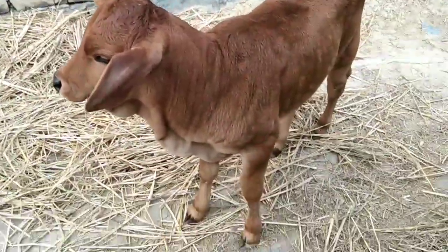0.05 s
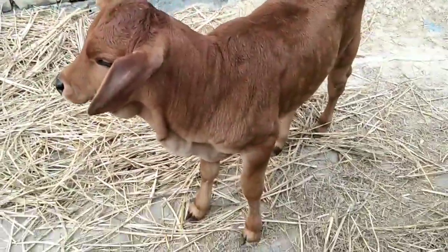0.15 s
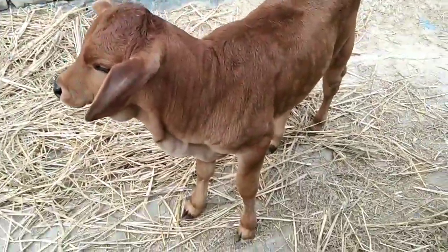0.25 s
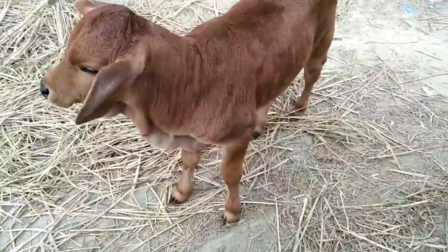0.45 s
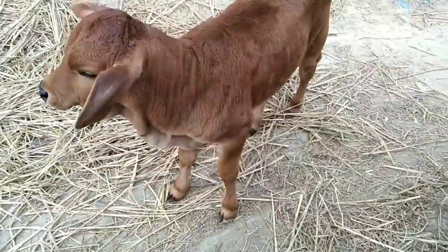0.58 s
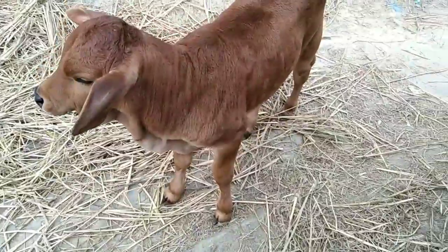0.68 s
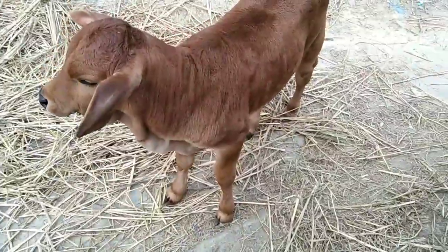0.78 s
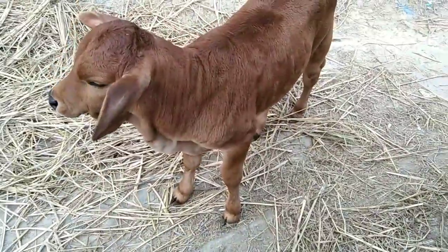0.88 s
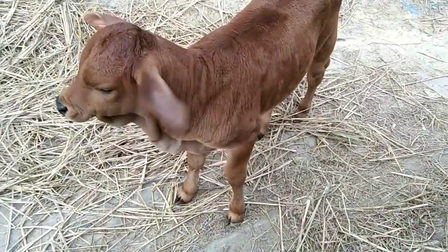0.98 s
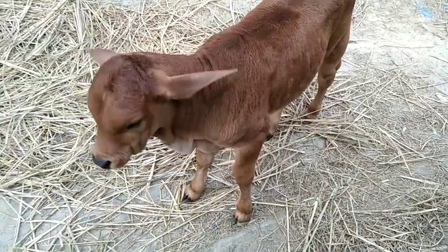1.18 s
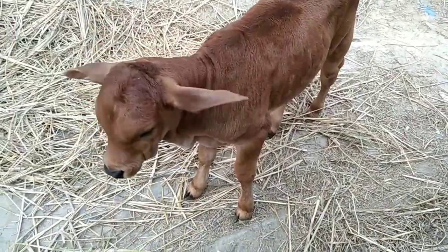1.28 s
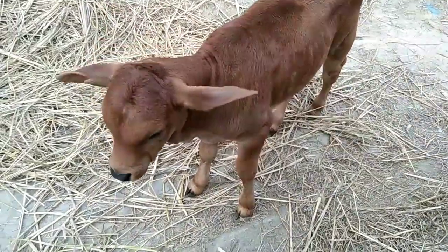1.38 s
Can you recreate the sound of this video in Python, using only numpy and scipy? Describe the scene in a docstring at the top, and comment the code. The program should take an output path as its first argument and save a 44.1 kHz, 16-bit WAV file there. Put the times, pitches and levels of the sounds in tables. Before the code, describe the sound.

A calf bleats once, a harsh, quavering call that throbs rapidly and sags in pitch at the end. Straw rustles faintly underneath, with a brief echo off the farmyard walls and a low outdoor rumble.

```python
"""Calf bleat in a walled farmyard.

One harsh, quavering bleat throbs ten times: the pitch climbs, then drops as the tone gives way to rasp.
Jittery vocal-fold pulses and puffs of noise ring in the throat while the mouth opens and closes.
Straw rustles, a stalk creaks, the walls ring briefly; a low rumble and a faint far hum lie underneath."""
import sys
import numpy as np
from scipy import signal
from scipy.fft import rfft, irfft
from scipy.io import wavfile
from scipy.ndimage import uniform_filter1d

SR = 44100
rng = np.random.default_rng(int(sys.argv[2]) if len(sys.argv) > 2 else 0)


def unload_audio(sound):
    """Save the sound as a 16-bit wav file, at the path given as the first command line argument."""
    columns = np.transpose(np.atleast_2d(sound))
    # keep every value between -1 and 1, then stretch to whole-number steps
    steps = np.round(np.clip(columns, -1, 1) * 32767)
    wavfile.write(sys.argv[1], SR, steps.astype(np.int16))


N = 63945
TIME_S = np.arange(N) / SR
FREQ_HZ = np.fft.rfftfreq(N, 1 / SR)

# Noise spectra. Each row: frequency in Hz, relative level in dB.
RUMBLE_SPECTRUM = [(20, -20.5), (40, -11), (65, 4), (130, 1), (210, -8.5), (300, -21.5), (500, -27.5),
                   (750, -29.5), (1500, -26.5), (2600, -47), (4500, -42), (8000, -40.5), (12000, -43.5),
                   (15000, -54.5)]
LOW_RUSTLE_SPECTRUM = [(40, -31), (110, -2), (260, -3.5), (430, 0.5), (560, -1.5), (700, -15.5),
                       (1500, -50.5)]
STRAW_SPECTRUM = [(1000, -35), (3500, -23.5), (5000, -8), (7700, 0.5), (9500, -1.5), (12000, -13),
                  (15500, -26.5)]
CREAK_SPECTRUM = [(1000, -22.5), (1350, -12.5), (1520, 5.5), (1700, -15), (2400, -6), (2700, -12.5),
                  (3000, 2.5), (3350, -1), (3600, 1), (4100, -13.5), (5200, -9), (6000, -39.5)]
RASP_SPECTRUM = [(500, -6.5), (850, -8), (1050, -1), (2400, 5), (4200, -2), (7000, 1)]
# Level curves. Each row: time in seconds, gain in dB.
RUMBLE_ENVELOPE = [(0, -64.5), (.2, -67.5), (.7, -69), (1.0, -71.5), (1.18, -70.5), (1.29, -64),
                   (1.45, -72)]
HUM_ENVELOPE = [(0, -80), (.2, -76.5), (.3, -97.5), (1.22, -91), (1.275, -67), (1.32, -80.5), (1.42, -66),
                (1.45, -66.5)]
LOW_RUSTLE_ENVELOPE = [(0, -77), (.17, -78), (.25, -62), (.42, -58.5), (.58, -62.5), (.75, -66.5),
                       (.9, -80), (1.2, -98.5), (1.27, -81.5), (1.45, -75.5)]
# Far hum. Each row: centre in Hz, width in Hz, relative level in dB.
HUM_BANDS = [(492.5, 71, -1), (1019, 55, -19), (1566, 33, -26.5)]
# Yard decay. Each row: frequency in Hz, time to fall 60 dB in seconds.
YARD_DECAY = [(200, 0.01), (800, 0.34), (2400, 0.3786), (4200, 0.4313), (8000, 0.4285), (14000, 0.25)]
# Yard echo colour. Each row: frequency in Hz, gain in dB.
YARD_SPECTRUM = [(200, -8), (700, -9), (780, -3), (860, -13), (1010, 4), (1200, -2), (1550, 6.5),
                 (1800, 4.5), (2020, 3), (2330, 0), (2800, -5.5), (3450, -2.5), (3800, -10.5), (4220, -1),
                 (4800, -5), (8000, -2.5)]
# Ground and near walls. Each row: delay in seconds, signed gain.
REFLECTIONS = [(.0011, 0.47), (.0029, -0.38), (.0047, .3), (.0075, .18)]
# Straw events. Each row: peak time in seconds, level in dB, rise in seconds, decay in seconds.
RUSTLE_BURSTS = [(0.014, -58, 0.0244, 0.0221), (.16, -67, 0.0071, 0.007827), (0.244, -62.5, .022, 0.054),
                 (0.34, -58.5, 0.0132, 0.026), (.435, -55, 0.01675, 0.038), (0.484, -56, 0.018, 0.017),
                 (0.571, -64.5, 0.014, 0.067)]
CREAK_BURSTS = [(.128, -73, .007, .06)]
# Throat response, mouth open and nearly shut. Each row: frequency in Hz, gain in dB.
THROAT_OPEN = [(150, -41.5), (330, -46.5), (425, -19), (520, -40.5), (610, -25), (700, -11), (790, -3.5),
               (855, 2), (930, -8), (1020, -4.5), (1110, -17.5), (1210, -6), (1290, -19.5), (1400, -22.5),
               (1850, -31.5), (2050, -14.5), (2220, -10.5), (2430, -6), (2750, -28), (3020, -10.5),
               (3150, -15), (3400, -4.5), (3550, -15.5), (3780, -3), (4000, -6.5), (4220, -2.5),
               (4450, -18.5), (5200, -19.5), (5600, -17), (6000, -25.5), (8000, -26), (8900, -33),
               (9500, -50.5), (15000, -65)]
THROAT_SHUT = [(150, -35), (420, -46), (580, -33.5), (750, -2.5), (880, 1), (1000, -19.5), (1350, -28.5),
               (1900, -26.5), (2300, -9), (2850, -33), (3450, -7.5), (3900, -15.5), (4250, -5.5),
               (4700, -17), (6000, -23), (7800, -29), (9000, -63), (15000, -56.5)]
# Throbs of the bleat. Each row: centre in seconds, pitch near the top in Hz, drive gain in dB,
# treble gain in dB, rasp gain in dB, mouth opening from 0 to 1.
BLEAT_THROBS = [(.252, 431.2, -47.5, -1, 2.5, 0), (.357, 426.7, -40.5, -1.5, 1.5, 0.58),
                (.448, 428.8, -39.5, 0.5, 0, 0.75), (.545, 429.8, -42.5, -.5, 3.5, 0.97),
                (.640, 424.2, -44, 0, 4, 0.91), (.737, 421.8, -43.5, 0.5, 2, 0.91),
                (.833, 416.5, -43.5, -1.5, 1, 0.94), (.930, 407.7, -42.5, -2, -2, 0.66),
                (1.028, 405, -44, -2, 1.5, 0.51), (1.116, 390.7, -42, -2, -7.5, 0.04)]
# Course of one throb. Each row: position from -0.5 to 0.5, ratio to the top pitch, tone gain in dB.
THROB_CONTOUR = [(-.5, .87, -17.5), (-.33, .945, -11), (-.16, .99, -2), (0, 1.008, -1.5), (.09, 1.0, -2),
                 (.19, 0.863, -6), (.3, .81, -12), (0.501, .87, -16.5)]


def amp(db):
    """Decibels to gain."""
    return 10 ** (np.asarray(db) / 20)


def unit_rms(x):
    """Scale to an rms of one."""
    return x / np.sqrt(np.mean(x ** 2) + 1e-20)


def at_hz(points, hz):
    """Interpolate on a log-frequency axis."""
    point_hz, value = np.transpose(points)
    return np.interp(np.log(hz + 1), np.log(point_hz + 1), value)


def envelope(points):
    """Gain over time from (s, dB) points."""
    return amp(np.interp(TIME_S, *np.transpose(points)))


def filtered(x, gain):
    """Apply one gain per frequency."""
    return irfft(rfft(x) * gain, N)


def lowpass(x, cutoff_hz, order=6):
    """Zero-phase low-pass."""
    return filtered(x, 1 / (1 + (FREQ_HZ / cutoff_hz) ** order))


def noise(spectrum):
    """Unit-rms coloured noise."""
    return unit_rms(filtered(rng.standard_normal(N), amp(at_hz(spectrum, FREQ_HZ))))


def wobble(rate_hz):
    """Unit-rms random wavering up to a rate."""
    return unit_rms(lowpass(rng.standard_normal(N), rate_hz, order=4))


def burst(peak_s, db, rise_s, decay_s):
    """Envelope: Gaussian rise, exponential decay."""
    age_s = TIME_S - peak_s
    return amp(db) * np.exp(-(np.minimum(age_s, 0) / rise_s) ** 2 - np.maximum(age_s, 0) / decay_s)


def far_hum():
    """Faint hum of narrow noise bands."""
    hum = np.zeros(N)
    for centre_hz, width_hz, db in HUM_BANDS:
        band = 1 / (1 + (2 * (FREQ_HZ - centre_hz) / width_hz) ** 2)
        hum += amp(db) * unit_rms(filtered(rng.standard_normal(N), band))
    return hum * envelope(HUM_ENVELOPE)


def rumble():
    """Low outdoor noise, drifting in level."""
    return noise(RUMBLE_SPECTRUM) * envelope(RUMBLE_ENVELOPE)


def yard_echo(x):
    """Dense wall echoes, each band dying at its own rate."""
    hz, age_s, bands = signal.stft(rng.standard_normal(SR), SR, nperseg=256)
    t60_s = at_hz(YARD_DECAY, hz)[:, None]
    gain = amp(at_hz(YARD_SPECTRUM, hz))[:, None] * np.sqrt(2 * np.log(1000) / (t60_s * SR))
    decay = np.exp(-np.log(1000) * age_s / t60_s)
    tail = signal.istft(bands * gain * decay, SR, nperseg=256)[1]
    return signal.fftconvolve(x, np.r_[np.zeros(200), tail])[:N]


def early_reflections(x):
    """Ground and near walls return the treble within milliseconds."""
    treble = x - lowpass(x, cutoff_hz=1712)
    return sum(gain * np.interp(TIME_S - delay_s, TIME_S, treble, left=0)
               for delay_s, gain in REFLECTIONS)


def low_rustle():
    """Dull noise swelling under the bleat."""
    return noise(LOW_RUSTLE_SPECTRUM) * envelope(LOW_RUSTLE_ENVELOPE)


def straw(grain_db=1.5):
    """Grainy rustles and one creaking stalk."""
    hiss = noise(STRAW_SPECTRUM) * unit_rms(amp(grain_db * wobble(rate_hz=400)))
    rustles = hiss * sum(burst(*row) for row in RUSTLE_BURSTS)
    creak = noise(CREAK_SPECTRUM) * sum(burst(*row) for row in CREAK_BURSTS)
    return rustles + creak


def throat(x, response):
    """Throat resonances, ringing as a minimum-phase filter."""
    size = 8192
    log_gain = np.log(amp(at_hz(response, abs(np.fft.fftfreq(size, 1 / SR)))))
    minimum_phase = np.exp(np.conj(signal.hilbert(log_gain)))
    ring = irfft(minimum_phase[:size // 2 + 1])[:size // 2]
    return signal.fftconvolve(x, ring)[:N]


def throbbing(centres_s):
    """Pitch ratio and tone gain in dB, rising and falling in each throb."""
    period_s, count = np.mean(np.diff(centres_s)), len(centres_s)
    padded_s = np.r_[centres_s[0] - period_s, centres_s, centres_s[-1] + period_s]
    throb = np.interp(TIME_S, padded_s, np.arange(count + 2)).clip(0, count + .5)
    position = throb - np.round(throb)
    positions, ratios, gains_db = np.transpose(THROB_CONTOUR)
    ratio = np.interp(position, positions, ratios)
    ratio = np.where(throb < 1, 1 / np.sqrt(ratio), ratio)  # first throb slides in from above
    swell_db = np.interp(position, positions, gains_db)
    return uniform_filter1d(ratio, size=250), uniform_filter1d(swell_db, size=250)


def vocal_folds(cycles, harmonics=28):
    """One sharp pulse per cycle: equally strong harmonics."""
    angle = np.pi * (cycles % 1) + 1e-9
    return (np.sin((2 * harmonics + 1) * angle) / np.sin(angle) - 1) / np.sqrt(2)


def rasp(cycles, pitch_hz):
    """Noise that puffs with each vocal-fold cycle."""
    puff = 1 + np.exp(-(cycles % 1) / 0.34)
    harmonic_scale = np.sqrt(SR / 2 / pitch_hz)  # same power per Hz as the pulses
    breath = unit_rms(puff * rng.standard_normal(N)) * harmonic_scale
    return filtered(breath, amp(at_hz(RASP_SPECTRUM, FREQ_HZ)))


def bleat():
    """Jittery fold pulses and rasp throb through the throat as the mouth opens and closes."""
    start_s, attack_s, end_s, release_s, treble_lag_s = .218, .014, 1.128, .035, .014
    jitter, shimmer, waver_hz = 0.00613, 0.35, 213.2
    centres_s, *columns = np.transpose(BLEAT_THROBS)
    top_hz, drive_db, treble_db, rasp_db, mouth = (np.interp(TIME_S, centres_s, c) for c in columns)
    pitch_ratio, swell_db = throbbing(centres_s)
    pitch_hz = top_hz * pitch_ratio
    cycles = np.cumsum(pitch_hz * (1 + jitter * wobble(waver_hz))) / SR
    tone = vocal_folds(cycles) * (1 + shimmer * wobble(waver_hz))
    rasp_gain = amp(rasp_db - 6 + 0.3494 * swell_db)  # dips less than the tone
    voice = tone * amp(swell_db) + rasp(cycles, pitch_hz) * rasp_gain
    lows = lowpass(voice, cutoff_hz=1710)
    treble_attack = np.clip((TIME_S - start_s - treble_lag_s) / attack_s, 0, 1)
    treble = (voice - lows) * amp(treble_db) * treble_attack
    attack = np.clip((TIME_S - start_s) / attack_s, 0, 1)
    release = np.clip(1 - (TIME_S - end_s) / release_s, 0, 1)
    drive = (lows + treble) * amp(drive_db) * attack * release
    return throat(drive * mouth, THROAT_OPEN) + throat(drive * (1 - mouth), THROAT_SHUT)


def scene():
    """Calf and straw in the yard, mono."""
    calf = bleat()
    near = calf + early_reflections(calf) + low_rustle() + straw()
    return (near + yard_echo(near) + far_hum() + rumble())[None]


def record(dry):
    """Steep treble cut."""
    cutoff_hz = 15650
    taps = signal.firwin(511, cutoff_hz, window=("kaiser", 9), fs=SR)
    return signal.oaconvolve(dry, taps[None], "same")


dry = scene()
out = record(dry)
unload_audio(out)
```